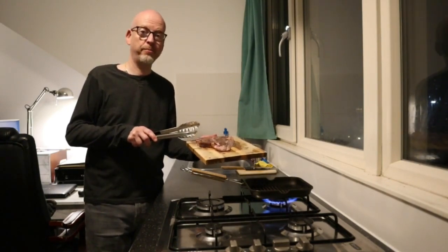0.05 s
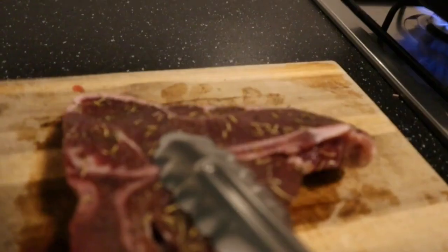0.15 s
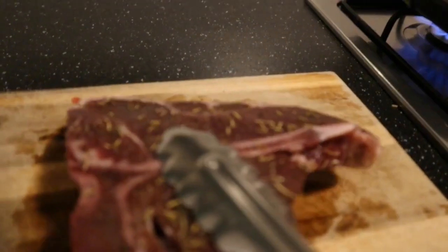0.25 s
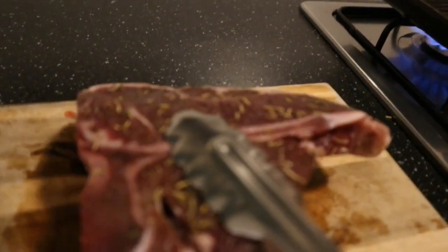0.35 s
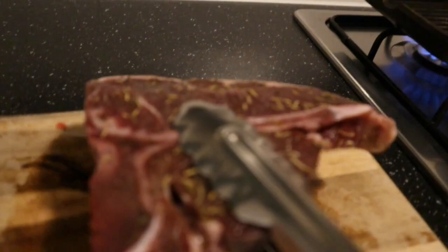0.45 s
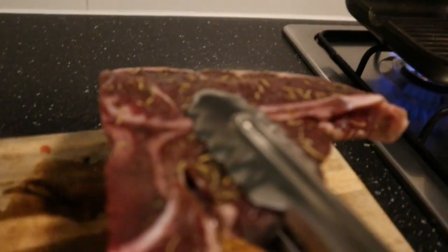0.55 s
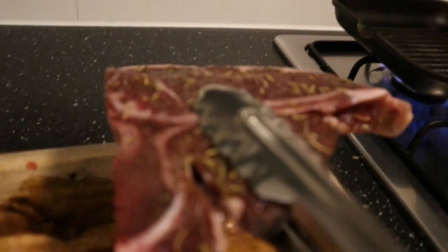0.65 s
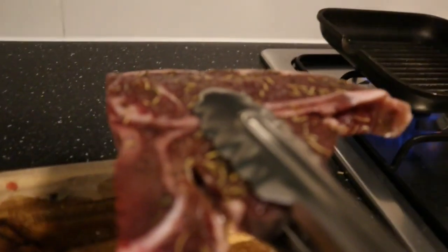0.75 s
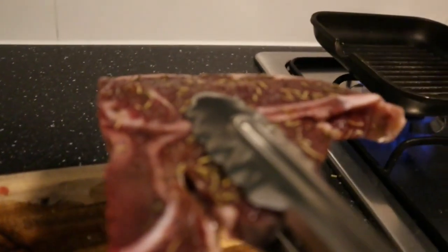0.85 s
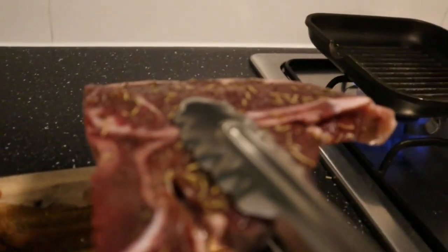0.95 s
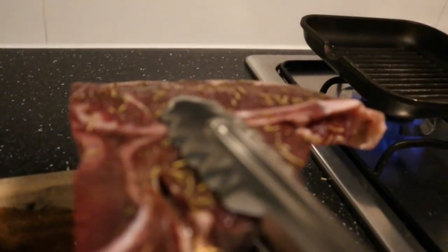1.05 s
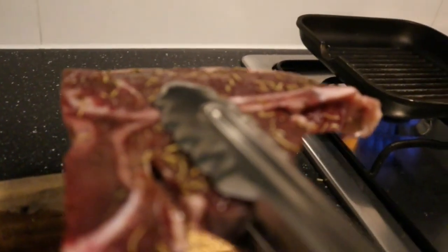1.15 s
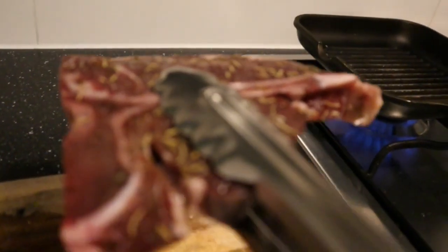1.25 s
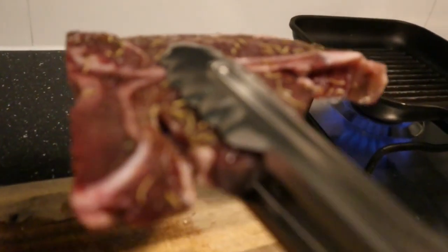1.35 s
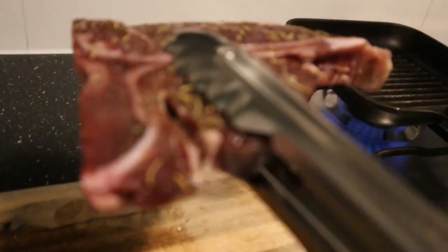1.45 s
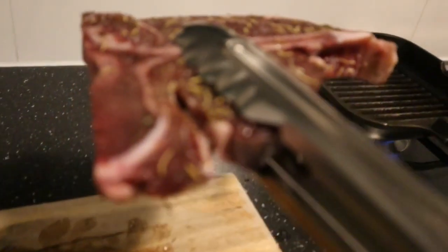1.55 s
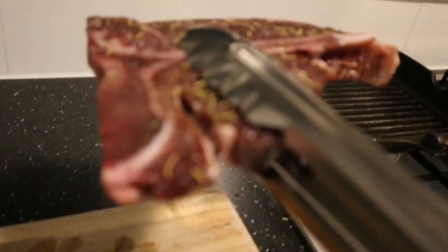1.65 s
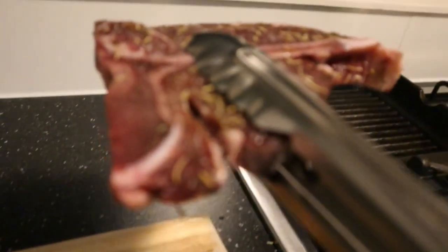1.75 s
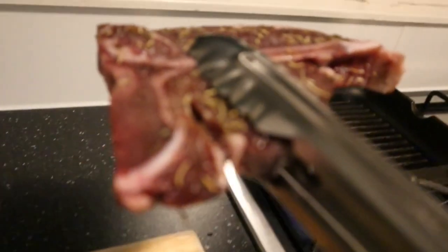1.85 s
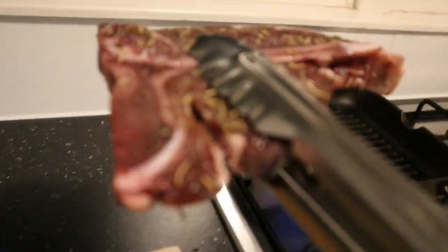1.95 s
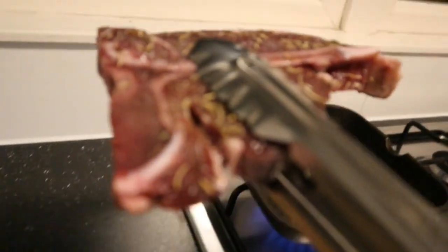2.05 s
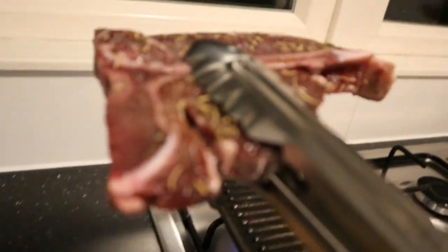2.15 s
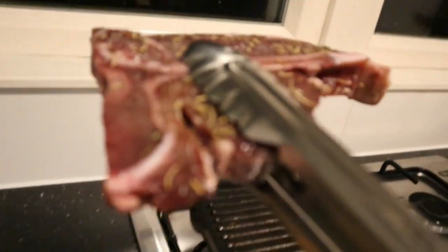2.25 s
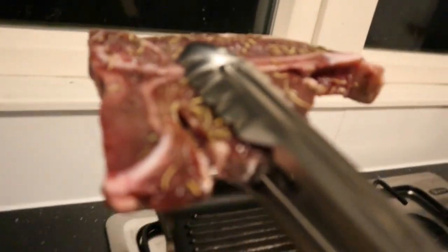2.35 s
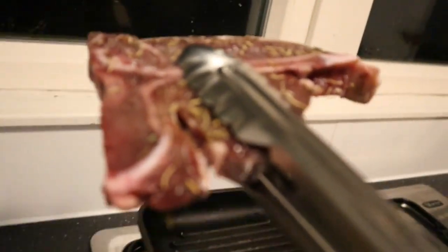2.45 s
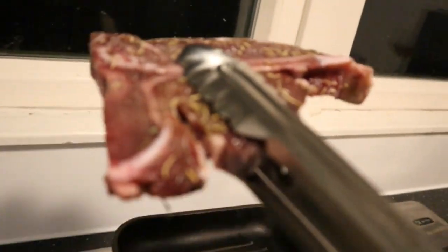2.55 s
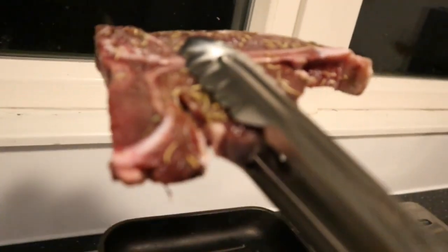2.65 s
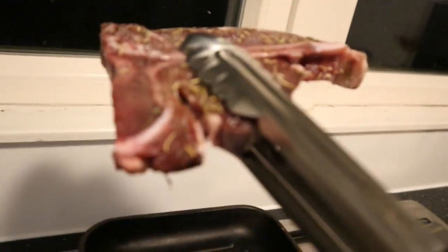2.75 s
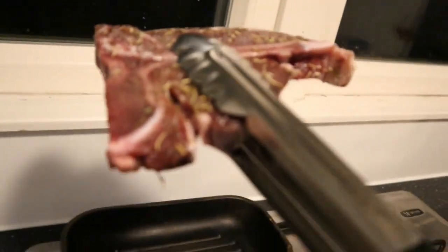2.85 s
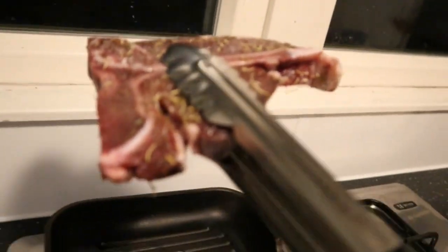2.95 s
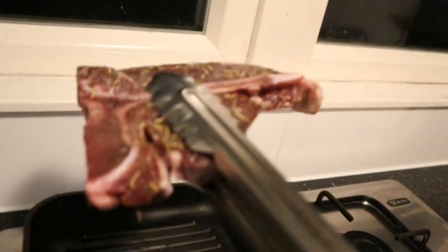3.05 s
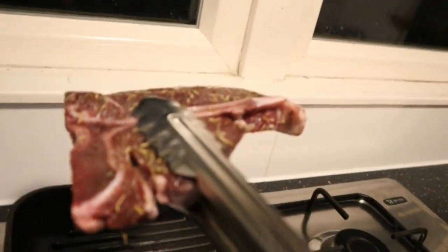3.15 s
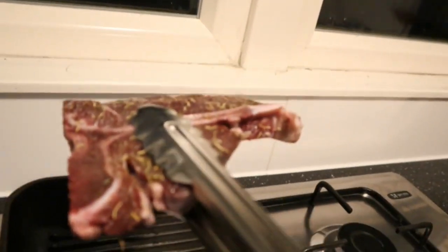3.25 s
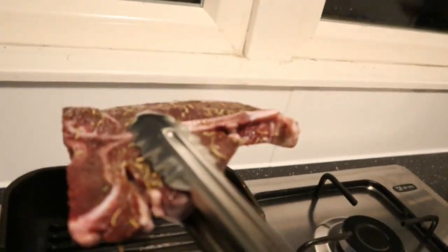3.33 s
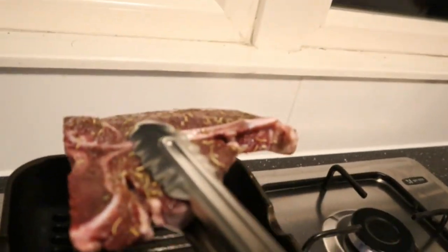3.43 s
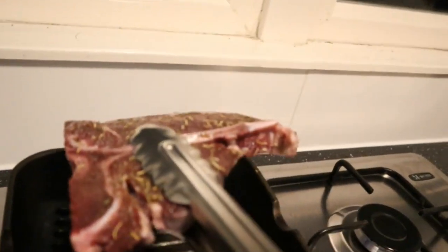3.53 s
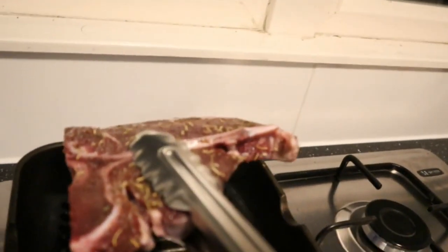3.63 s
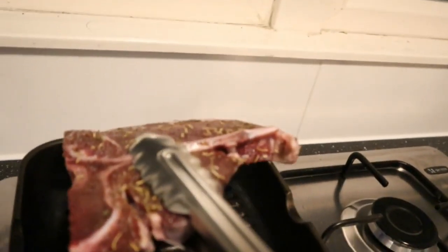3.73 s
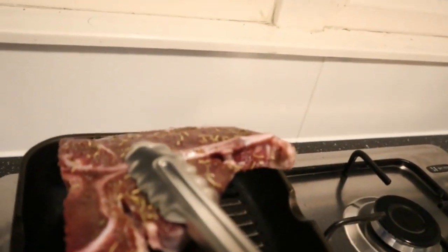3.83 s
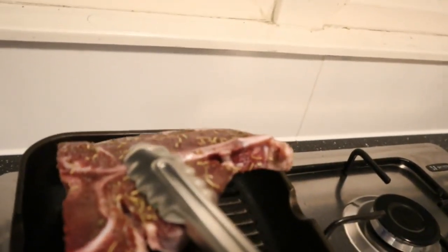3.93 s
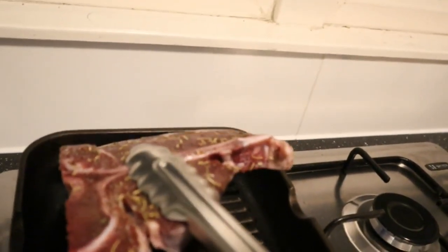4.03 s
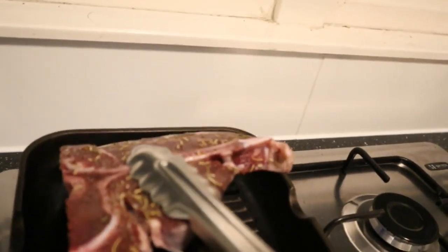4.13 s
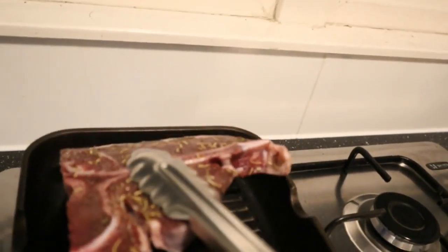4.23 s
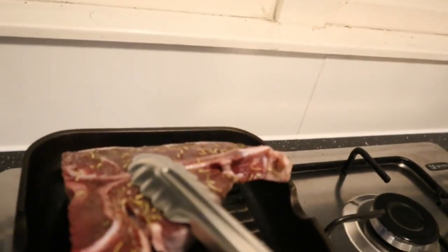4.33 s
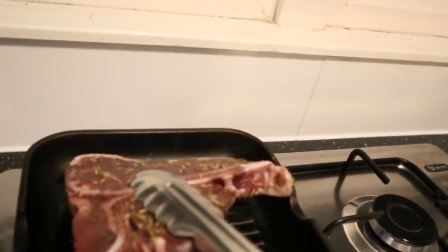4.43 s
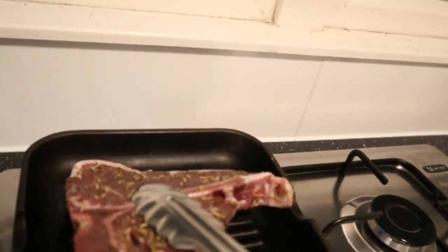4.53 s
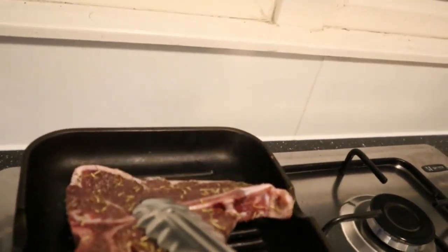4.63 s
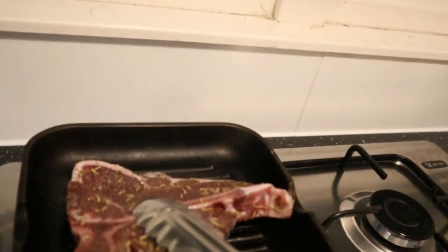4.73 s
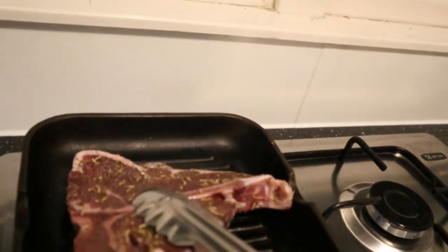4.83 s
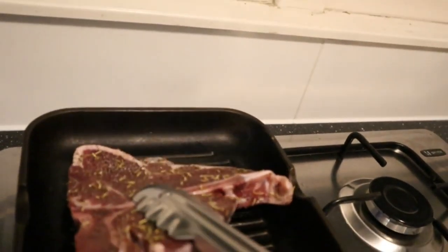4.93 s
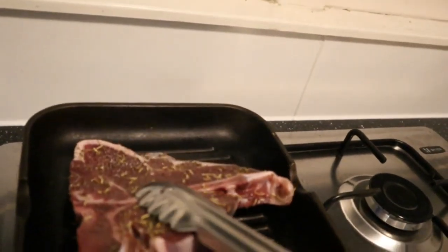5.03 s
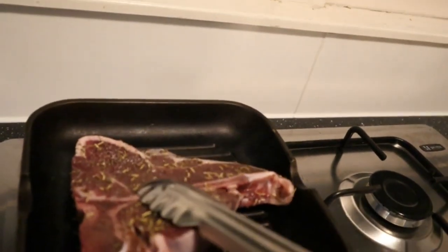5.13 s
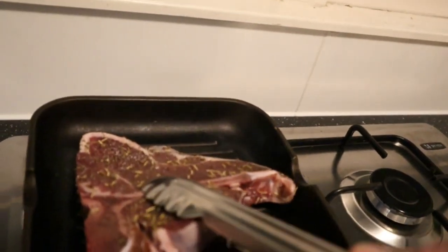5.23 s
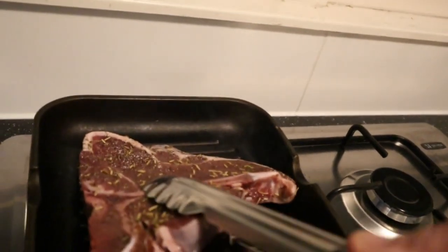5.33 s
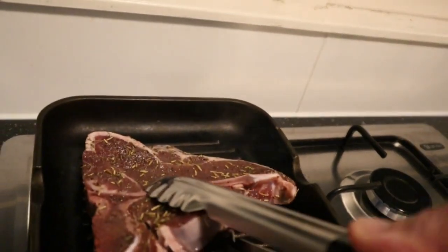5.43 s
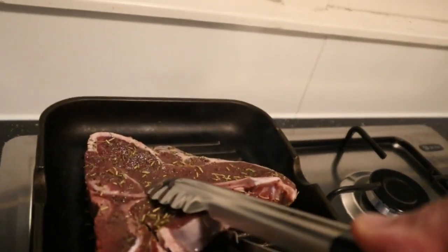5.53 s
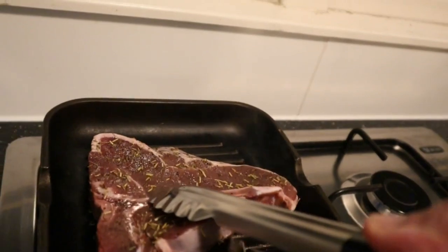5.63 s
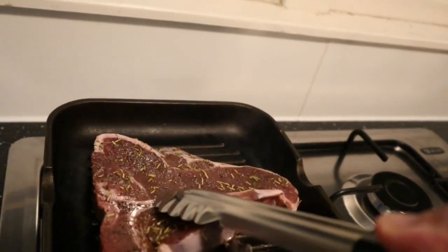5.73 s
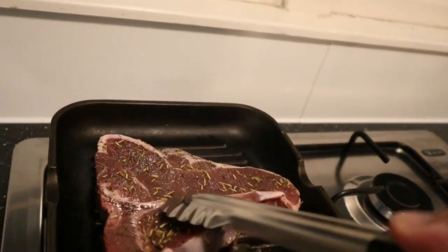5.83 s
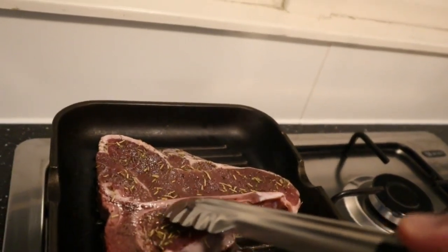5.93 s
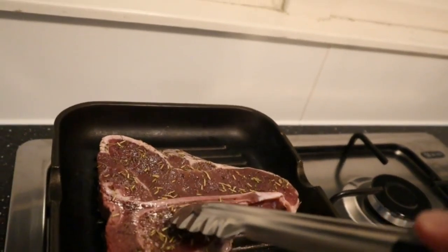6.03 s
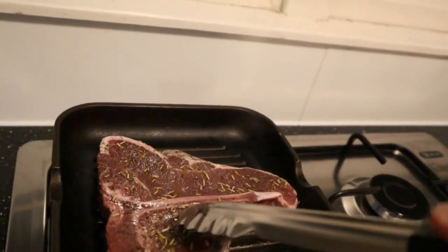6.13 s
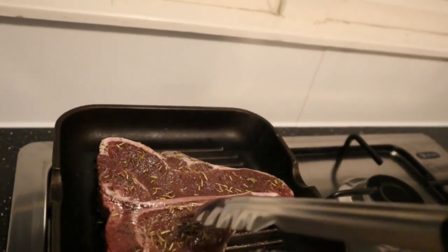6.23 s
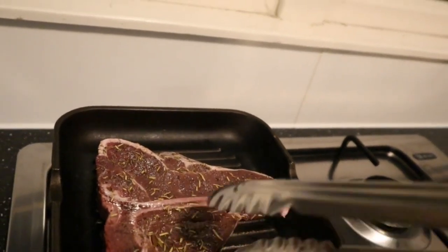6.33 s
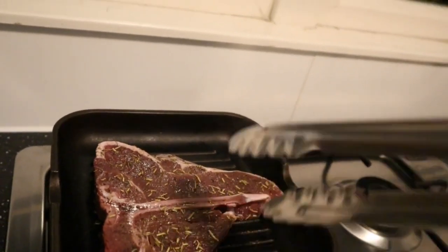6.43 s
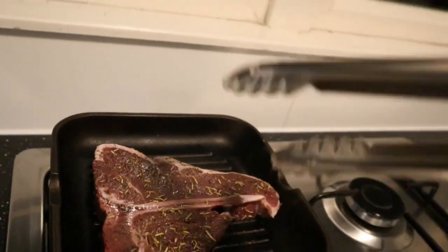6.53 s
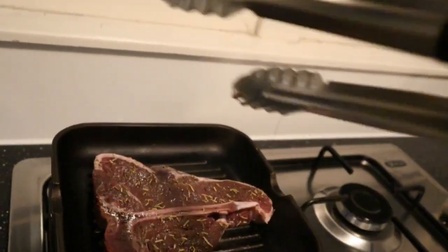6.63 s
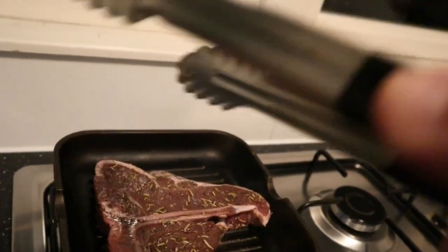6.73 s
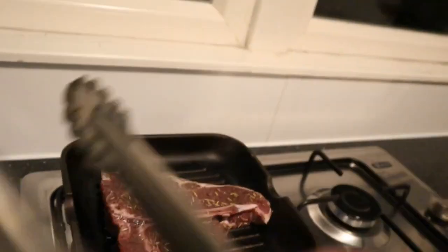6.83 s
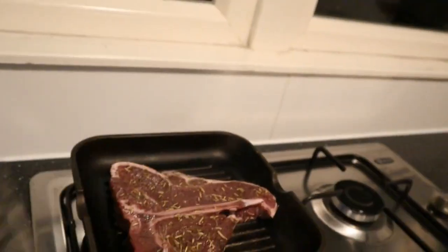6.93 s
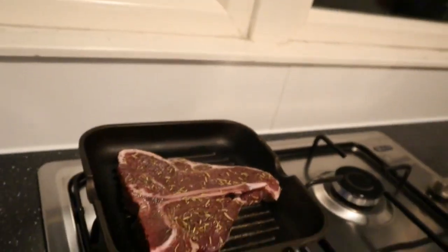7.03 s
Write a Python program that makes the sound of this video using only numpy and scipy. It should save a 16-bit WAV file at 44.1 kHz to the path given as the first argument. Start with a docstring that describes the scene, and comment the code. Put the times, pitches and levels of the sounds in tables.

```python
"""Kitchen: a gas ring hisses and whistles while a steak is peeled off its board and pressed into a hot ridged pan.
Peeling and spits are short decaying tone bursts. One edge dabs the iron first, then the whole face sears:
random clicks over noise, filtered into a fine fizz and a lower roar of steam. The gas is noise through
burner resonances; house rumble and hand shake are low noise. A two-stage gain control turns loud
passages down. One microphone feeds both channels."""
import sys
import numpy as np
from scipy import signal
from scipy.fft import rfft, irfft
from scipy.io import wavfile
from scipy.ndimage import uniform_filter1d

SR = 44100
rng = np.random.default_rng(int(sys.argv[2]) if len(sys.argv) > 2 else 0)


def store_wav(level_fs):
    """Save 16-bit WAV to argv[1]."""
    pcm = np.round(np.clip(np.atleast_2d(level_fs), -1, 1) * 32767)
    wavfile.write(sys.argv[1], SR, pcm.T.astype(np.int16))


N = 311787
HOP, FRAME = 128, 512  # samples
FRAME_S = np.arange(N // HOP + 5) * HOP / SR
SAMPLE_S = np.arange(N) / SR
BIN_HZ = np.fft.rfftfreq(FRAME, 1 / SR)[:, None]

# All levels are relative, ahead of the gain control.
# fine fizz at the rim: freq_hz, density_db_per_hz
FIZZ_SPECTRUM = [(1500, -31), (4000, -8.5), (6000, -8.5), (8500, -4.5), (10500, -13), (13000, -10.5),
                 (16000, -16)]
# steam roar in the grooves: freq_hz, density_db_per_hz
ROAR_SPECTRUM = [(200, -28), (600, -27), (850, -17.5), (1100, -9), (1900, 0), (3300, -1), (4500, -3),
                 (5500, -11.5), (9000, -12.5)]
# pan hollows colouring the whole sizzle: centre_hz, width_hz, lift_db
PAN_HOLLOWS = [(944, 33, 6), (2040, 63, 3.5), (2740, 250, 1), (3230, 490, 1), (6570, 500, 2),
               (7600, 230, 0.5), (9400, 600, 2), (13140, 1100, 3.5)]
# upper groove resonance: centre_hz, width_hz
UPPER_GROOVE = (4100, 410)
# one edge dabs the iron: start_s, hold_s, fizz_db, roar_re_fizz_db
EDGE_DABS = [(4.137, 0.11, -29, -12), (4.248, .06, -25.5, -8), (4.38, 0.036, -28, -7),
             (4.43, .1, -27.5, -7)]
# whole face sears: time_s, fizz_db
FACE_LEVEL = [(4.5, -38), (4.58, -22.5), (4.66, -7), (4.75, -4), (4.9, -2), (5.2, -0.5), (5.57, 8),
              (5.62, 4), (5.75, 5), (5.95, 8), (6.1, 5.5), (6.22, 4), (6.28, 1.5), (6.65, 3.5), (6.8, -1),
              (6.87, -5), (6.97, -4), (7.07, -3)]
# tongs bear down: start_s, let_go_s, force (0-1)
TONG_PRESSES = [(4.103, 4.83, 0.91), (5.64, 6.18, 0.4), (6.72, 6.85, 0.08)]
# juice drops bursting on the iron: start_s, level_db, pitch_hz
JUICE_SPITS = [(4.1609, -11, 7500), (4.2134, -15, 7500), (4.2577, -7, 8000), (4.2964, -13, 7500),
               (4.3244, -14, 7500), (4.4353, -13, 5500), (4.4934, -16, 7500), (4.5421, -15, 7500),
               (5.5834, 10, 8000), (6.0784, 10, 3000)]
# gas whistling in burner and pipe: centre_hz, nominal_width_hz, before_turn_db, after_turn_db
BURNER_MODES = [(938, 400, -42, 1), (1930, 71, 0, 2), (4700, 356, -8, -9), (5330, 190, -14, -15.5),
                (6830, 186, 1, 2), (8420, 560, -13, -24), (8780, 730, -10.5, -16),
                (10300, 400, -19.5, -20.5), (13300, 700, -23, -31), (13860, 180, -10, -15.5),
                (15500, 300, -20, -23), (15600, 250, -16, -20)]
# broad rush of the flame: freq_hz, before_turn_db_per_hz, after_turn_db_per_hz
FLAME_SPECTRUM = [(300, -21.5, -24), (714, -17, -17.5), (2000, -23.5, -25), (3420, -21, -23.5),
                  (7260, -17.5, -17.5), (11500, -29, -29), (16000, -38, -39)]
# broad flame band: centre_hz, nominal_width_hz, level_db
BROAD_BAND = (1580, 630, -9)
# broad band coming and going with the view of the flame: time_s, extra_db
BROAD_BAND_LEVEL = [(.09, -9), (.11, 3), (.4, 0.5), (1.0, -3), (1.6, 0), (2.2, -2), (2.6, -12), (3.4, -5.5),
                    (4.3, 0.5)]
# turn of the microphone: time_s, turn (0-1)
MIC_TURN = [(0, 0.15), (1.3, .08), (2.1, 0.65), (2.8, 0.74), (3.5, 0.77), (4.5, .86)]
# wet meat unsticking from the board: start_s, level_db, pitch_hz
BOARD_PEEL = [(.1105, -11, 3900), (.120, -15, 9000), (.1262, -15.5, 2820), (.1268, -26, 1020),
              (.1365, -9, 8500), (.144, -26, 1110), (.1507, -10, 4800), (.1525, -8, 7200),
              (.1625, -14, 3800), (.182, -11, 3770), (.2015, -8.5, 4230), (.233, -19, 4000),
              (.2427, -15, 5500)]
# tongs nudge the pan: start_s, level_db, pitch_hz
PAN_NUDGE = (5.95, -20, 220)
# house and flame rumble: freq_hz, density_db_per_hz
RUMBLE_SPECTRUM = [(25, -5), (40, -1.5), (52, -4), (80, 1), (105, -3), (170, -5), (260, -11.5), (400, -13),
                   (460, -25), (500, -11.5), (620, -32.5), (1100, -90)]

DAB_RISE_S, DAB_FADE_DB_PER_S = 0.014, 198
PRESS_RISE_S, EASE_PER_S, DRAIN_S = 0.11, 1.6, 0.4  # force builds, eases; squeezed juice boils away later
ROAR_REST_HZ, ROAR_PRESS_HZ = 2110, 1510  # groove resonance at rest; its rise per unit force
FIZZ_DRY_HZ, FIZZ_WET_HZ = 8900, 7960  # rim resonance, grooves dry and flooded
ROAR_DRY_DB, ROAR_WET_DB = -6, -1  # roar re fizz
LIFT_DB, LIFT_PRESS_DB = 3.5, 1.5  # groove resonance; extra per unit force
UPPER_DB, UPPER_PRESS_DB = 0, 4.5  # upper groove at rest; extra while the tongs bear down
AIR_HZ, AIR_DB_PER_S, SEARED_S = 9600, 2.5, 5.54  # fizz top gains for 1 s, centred here, as the face dries
GAS_DB, GAS_DB_PER_S = -28.5, -0.5  # sinks as the microphone is carried past
CLOSE_S, FAR_DB = 0.1, -1.5  # gas and rumble are fainter before CLOSE_S
RUMBLE_DB, RUMBLE_DB_PER_S, NEAREST_S = -37.5, 0.83, 4  # grows until nearest the flame
SHAKE_DB, SHAKE_SPREAD_DB = -37, 2
STEADIED_S, STEADIED_DB = 3.83, -17  # calms over 1 s, centred here, as the arm comes to rest
EDGE_HZ = 15730


def gain_of(db):
    """Decibels to amplitude."""
    return 10 ** (np.asarray(db) / 20)


def evened(x):
    """Scales to rms 1."""
    return x / np.sqrt(np.mean(x ** 2) + 1e-20)


def read(points, hz):
    """Columns of a spectrum table on a log-frequency axis."""
    f, *values = np.transpose(points)
    return [np.interp(np.log(hz + 1), np.log(f + 1), v) for v in values]


def played(rows, t):
    """Columns of a curve table at the times t."""
    s, *values = np.transpose(rows)
    return [np.interp(t, s, v) for v in values]


def peak(hz, centre_hz, width_hz):
    """Power response of one resonance, 1 at its centre."""
    return 1 / (1 + (2 * (hz - centre_hz) / width_hz) ** 2)


def patches(bins, frames):
    """Random field of rms 1 over frequency and time, smoothed over the given cells."""
    field = rng.standard_normal((len(FRAME_S), len(BIN_HZ))).T
    across_bins = uniform_filter1d(field, bins, 0)
    return evened(uniform_filter1d(across_bins, frames, 1))


def shaped(x, magnitude):
    """Weights short-time spectra of x; each frame's weights have mean square 1."""
    overlap = FRAME - HOP
    z = signal.stft(x, nperseg=FRAME, noverlap=overlap)[2]
    magnitude = magnitude / np.sqrt(np.mean(magnitude ** 2, 0))
    weighted = z * magnitude[:, :z.shape[1]]
    return signal.istft(weighted, nperseg=FRAME, noverlap=overlap)[1][:N]


def pops(rows, cycles):
    """Short tone bursts: swell over cycles / 2 periods, then fade."""
    out, t = np.zeros(N), np.arange(400) / SR
    for start_s, level_db, pitch_hz in rows:
        u = 2 * t * pitch_hz / cycles
        burst = u * np.exp(1 - u) * np.sin(2 * np.pi * pitch_hz * t)
        out[round(start_s * SR):][:len(t)] += gain_of(level_db) * burst
    return out


def sear():
    """Fizz at the rim, steam roar in the grooves; force and juice shift their resonances."""
    force, down, wet = presses(FRAME_S)
    fizz_hz = FIZZ_DRY_HZ + wet * (FIZZ_WET_HZ - FIZZ_DRY_HZ)
    roar_hz = ROAR_REST_HZ + ROAR_PRESS_HZ * force
    groove_db = (LIFT_DB + LIFT_PRESS_DB * force) * peak(BIN_HZ, roar_hz, 500)
    groove_db = groove_db + (UPPER_DB + UPPER_PRESS_DB * down) * peak(BIN_HZ, *UPPER_GROOVE)
    pan_db = sum(db * peak(BIN_HZ, hz, width_hz) for hz, width_hz, db in PAN_HOLLOWS)
    # bursts shake wide bands; vents open and close slowly
    shared_db = pan_db + 0.47 * patches(200, 2) + 0.74 * patches(3, 120)
    treble = 1 / (1 + (AIR_HZ / (BIN_HZ + 1)) ** 10)
    air_db = AIR_DB_PER_S * np.clip(FRAME_S - SEARED_S, -0.5, 0.5) * treble

    fizz_db = read(FIZZ_SPECTRUM, BIN_HZ)[0] + air_db + 3.54 * peak(BIN_HZ, fizz_hz, 1900)
    fizz_db = fizz_db + shared_db + 1.7 * patches(14, 30)
    roar_db = read(ROAR_SPECTRUM, BIN_HZ)[0] + groove_db + shared_db + 0.5 * patches(8, 30)
    fizz = shaped(bursts(1500, 2.6, 0.34), gain_of(fizz_db))
    roar = shaped(bursts(600, 2.1, 0.26), gain_of(roar_db))

    face = gain_of(played(FACE_LEVEL, FRAME_S)[0]) * (FRAME_S > EDGE_DABS[0][0])
    face_roar = face * gain_of(ROAR_DRY_DB + wet * (ROAR_WET_DB - ROAR_DRY_DB))
    edge, edge_roar = dabs(FRAME_S)
    fizz_level = np.interp(SAMPLE_S, FRAME_S, np.hypot(face, edge))
    roar_level = np.interp(SAMPLE_S, FRAME_S, np.hypot(face_roar, edge_roar))
    return fizz_level * fizz + roar_level * roar


def bursts(per_s, spread_db, share):
    """Steam bubbles: clicks of uneven size over a noise blur of countless small ones; share is click power."""
    size = gain_of(spread_db * np.minimum(rng.exponential(1, N), 4))
    happens = rng.random(N) < per_s / SR
    clicks = size * happens * rng.choice([-1, 1], N)
    return np.sqrt(share) * evened(clicks) + np.sqrt(1 - share) * rng.standard_normal(N)


def presses(t):
    """Tong force, whether they bear down, and groove flooding by squeezed juice, each 0-1."""
    start, stop, force = np.transpose(TONG_PRESSES)[..., None]
    rise = np.clip((t - start) / PRESS_RISE_S, 0, 1)
    pushed = np.clip(force - EASE_PER_S * np.maximum(t - stop, 0), 0, 1) * rise
    down = rise * np.clip(1 - (t - stop) / PRESS_RISE_S, 0, 1)
    half_dry_s = stop + force / EASE_PER_S
    wet = rise * np.clip(0.5 - (t - half_dry_s) / DRAIN_S, 0, 1)
    return pushed.max(0), down.max(0), wet.max(0)


def dabs(t):
    """Fizz and roar amplitude of the first touches: quick rise, hold, quick fade."""
    start, hold, fizz_db, roar_db = np.transpose(EDGE_DABS)[..., None]
    rise = np.clip((t - start) / DAB_RISE_S, 0, 1)
    fade_db = DAB_FADE_DB_PER_S * np.maximum(t - start - hold, 0)
    each = rise * gain_of(fizz_db - fade_db)
    return np.linalg.norm(each, axis=0), np.linalg.norm(each * gain_of(roar_db), axis=0)


def spits():
    """Juice drops burst on hot iron, each a brief ringing pop."""
    return pops(JUICE_SPITS, cycles=2.2)


def gas():
    """Turbulence rings the burner's resonances; turning the microphone shifts their balance."""
    turn = np.clip(played(MIC_TURN, FRAME_S)[0], 0, 1.3)
    before, after = read(FLAME_SPECTRUM, BIN_HZ)
    power = gain_of(before + turn * (after - before)) ** 2
    broad_hz, broad_width_hz, broad_db = BROAD_BAND
    broad_gain = gain_of(broad_db + played(BROAD_BAND_LEVEL, FRAME_S)[0])
    power = power + broad_gain ** 2 * peak(BIN_HZ, broad_hz, broad_width_hz) ** 2
    for hz, width_hz, before_db, after_db in BURNER_MODES:
        mode_gain = gain_of(before_db + turn * (after_db - before_db))
        power = power + mode_gain ** 2 * peak(BIN_HZ, hz, width_hz) ** 1.43
    flutter = gain_of(1.4 * patches(5, 90))
    hiss = shaped(rng.standard_normal(N), np.sqrt(power) * flutter)
    return gain_of(GAS_DB + GAS_DB_PER_S * SAMPLE_S + FAR_DB * (SAMPLE_S < CLOSE_S)) * hiss


def peel():
    """Wet meat unsticks from the board in tiny, strongly damped clicks."""
    return pops(BOARD_PEEL, cycles=1.13)


def thud():
    """Nudged pan: one dull, decaying sine knock."""
    start_s, level_db, pitch_hz = PAN_NUDGE
    t = np.maximum(SAMPLE_S - start_s, 0)
    return gain_of(level_db) * np.exp(-t / 0.022) * np.sin(2 * np.pi * pitch_hz * t)


def kitchen(x, t60_s, wet_db, turns_per_s):
    """Tiles and window return sparse decaying echoes; three sets take turns as the microphone moves."""
    slots = np.arange(80, SR // 3, 20)
    wet, angle = 0, 2 * np.pi * turns_per_s * SAMPLE_S
    for k in range(3):
        taps = np.zeros(SR // 2)
        sign = rng.choice([-1., 1.], len(slots))
        taps[slots + rng.integers(0, 20, len(slots))] = sign * gain_of(-60 * slots / SR / t60_s)
        window = np.sqrt(2 / 3) * np.cos(angle + k * np.pi / 3)  # squares of the three sum to 1
        wet = wet + signal.oaconvolve(x * window, taps / np.linalg.norm(taps))[:N]
    return (x + gain_of(wet_db) * wet) / np.hypot(1, gain_of(wet_db))


def rumble():
    """Low noise of house and flame, plus the hand's uneven shaking around 15 Hz."""
    hz = np.fft.rfftfreq(N, 1 / SR)
    house, hand, uneven = rfft(rng.standard_normal((3, N)))
    house = evened(irfft(house * gain_of(read(RUMBLE_SPECTRUM, hz)[0]), N))
    hand = evened(irfft(hand * peak(hz, 15, 24) ** 2, N))
    uneven = evened(irfft(uneven * peak(hz, 0, 2.8), N))
    house_db = RUMBLE_DB + RUMBLE_DB_PER_S * np.minimum(SAMPLE_S, NEAREST_S)
    house_db = house_db + FAR_DB * (SAMPLE_S < CLOSE_S)
    steadied = np.clip(SAMPLE_S - STEADIED_S + 0.5, 0, 1)
    hand_db = SHAKE_DB + SHAKE_SPREAD_DB * uneven + STEADIED_DB * steadied
    hand_fade_in = np.clip(SAMPLE_S / CLOSE_S - 0.5, 0, 1)
    return gain_of(house_db) * house + gain_of(hand_db) * hand * hand_fade_in


def scene():
    """All sources at one microphone; the close board, the knock and the rumble get no echo."""
    stove = sear() + spits() + gas()
    echoed = kitchen(stove, t60_s=0.48, wet_db=-9, turns_per_s=0.12)
    mono = echoed + peel() + thud() + rumble()
    return np.array([mono, mono])


def record(dry):
    """Quick and slow gain reduction above a -19 dB threshold; clipping; band limit."""
    power_db = 10 * np.log10(abs(uniform_filter1d(dry[0] ** 2, 900)) + 1e-12)
    over_db = np.maximum(power_db + 19, 0)

    def lag(time_s):
        """One-pole smoothing of the excess level."""
        step = 1 / (time_s * SR)
        return signal.lfilter([step], [1, step - 1], over_db)

    ducked = dry / gain_of(0.53 * lag(0.029) + 0.53 * lag(0.84))
    clipped = np.clip(ducked, -1, 1)
    lowpass = signal.firwin(1023, EDGE_HZ, window=("kaiser", 9), fs=SR)
    return signal.oaconvolve(clipped, lowpass[None], "same")


dry = scene()
out = record(dry)
store_wav(out)
```